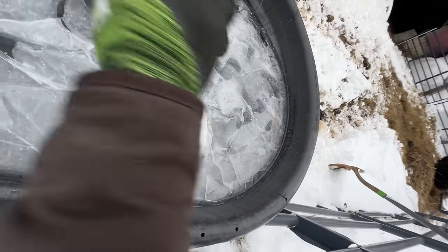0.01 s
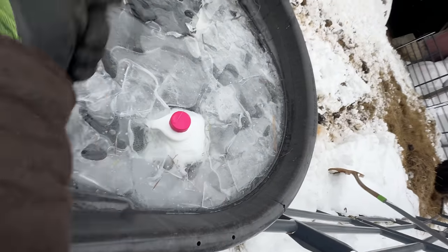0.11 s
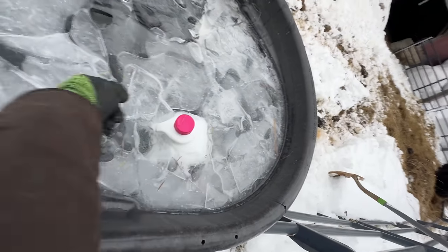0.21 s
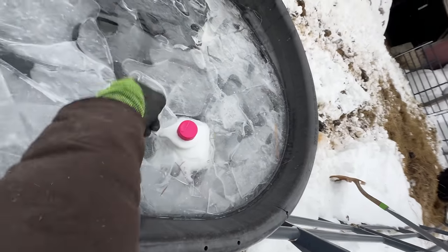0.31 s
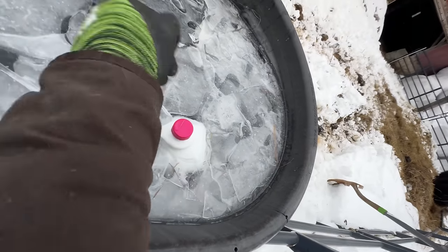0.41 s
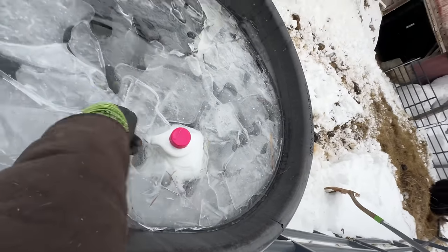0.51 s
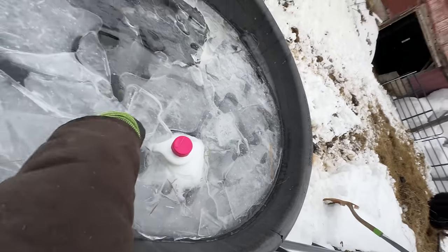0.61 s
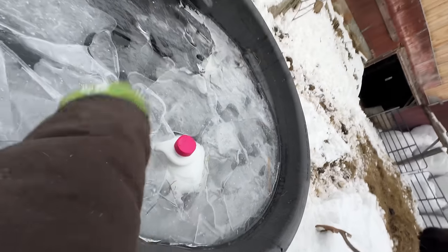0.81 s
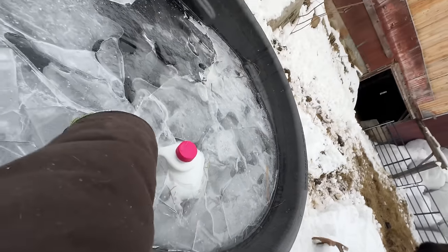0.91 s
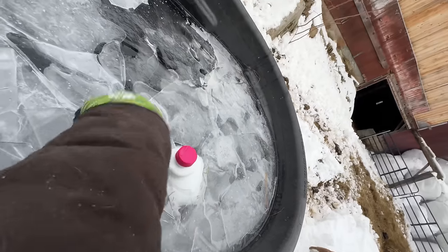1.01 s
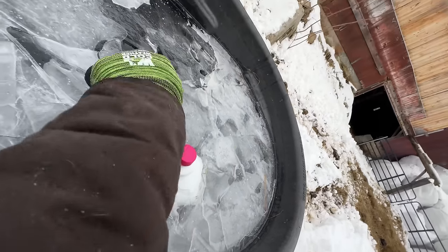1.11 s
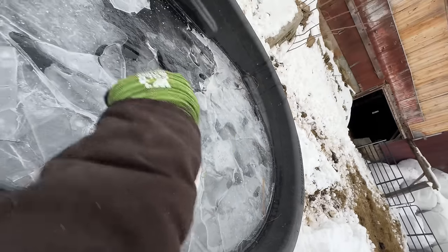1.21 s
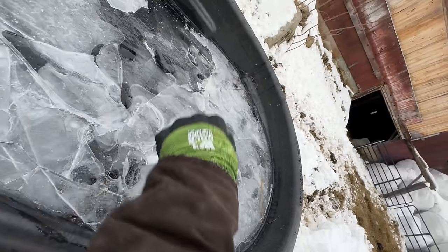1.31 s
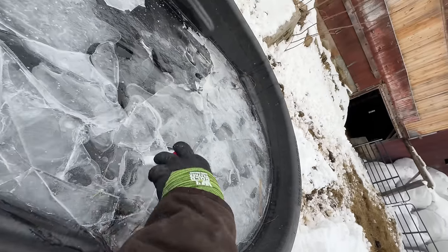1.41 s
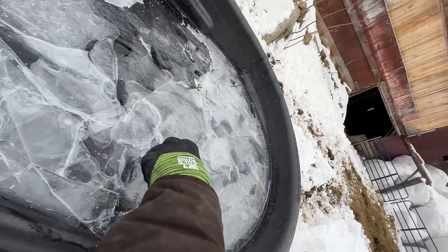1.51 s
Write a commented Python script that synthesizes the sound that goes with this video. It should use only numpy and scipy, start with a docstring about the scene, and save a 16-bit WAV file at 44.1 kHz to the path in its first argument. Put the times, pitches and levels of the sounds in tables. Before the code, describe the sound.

A gloved fist cracks ice on a plastic water trough in three quick blows, each a sharp snap with hollow thud and crumbling; shards clink, water gurgles at the end. Outdoors, close stereo microphone.

```python
"""A gloved fist punches the ice on a plastic water trough three times, outdoors, heard close up in stereo.
Each blow cracks the sheet (filtered grit), knocks its plates into the water and rings the trough (damped
sines), over a dull noise thud; crumbling follows and loose shards clink. Water sloshes and bubbles (noise,
pings, rising sines) as the hand comes back out, and a sleeve rustles (shaped noise), first on the first swing.
A near wall and the snowy yard return diffuse echoes over a faint outdoor rumble."""
import sys
import numpy as np
from scipy import signal
from scipy.fft import rfft, irfft
from scipy.io import wavfile

SR = 44100
rng = np.random.default_rng(int(sys.argv[2]) if len(sys.argv) > 2 else 0)


def digitize_waveform(pressure):
    """Quantize a signal to 16-bit integers and store it at the path in sys.argv[1].

    Rows of a 2-D input are taken as channels; values are limited to [-1, 1].
    """
    field = np.atleast_2d(pressure).T
    bounded = np.clip(field, -1, 1)
    quanta = np.round(bounded * 32767).astype(np.int16)
    wavfile.write(sys.argv[1], SR, quanta)


N = 68355  # samples, 1.55 s

# The fist lands: start_s, trough_db, favoured_pitch_hz, thud_db, hum_db, crumbling_db, crumbling_t60_s
FIST_BLOWS = [(0.2034, -17.5, 480, -17.5, -32.5, -25.5, 0.074), (0.5328, -21, 450, -18, -38, -20, .17),
              (0.874, -20, 243, -19, -31.5, -21, 0.25)]
# The sheet cracks or shards knock: start_s, level_db, hold_s, t60_s, peak_hz, peak_db (a dip if negative)
ICE_CRACKS = [(0.199, -12.5, 0.0019, 0.0044, 5820, 12), (0.2112, -22, 0.006, 0.082, 2950, 5),
              (0.2633, -32, 0.0041, 0.084, 4300, -1.5), (0.323, -39, 0.003, 0.027, 3830, 3),
              (0.37, -51, 0.01, .15, 3930, 3), (0.5215, -28.5, 0.015, 0.06, 2780, 12),
              (0.5344, -12.5, 0.0041, 0.0052, 4260, 1), (0.5453, -24.5, 0.0022, 0.039, 5900, -1),
              (0.601, -36, 0.0026, 0.019, 5740, 14), (0.6378, -41, 0.0036, 0.074, 5800, 4),
              (0.669, -49, 0.0053, .08, 4000, -5), (0.718, -59, 0.0045, 0.15, 4000, 0),
              (0.8643, -33, .005, 0.012, 1290, 2.5), (0.8707, -12.5, 0.003, 0.062, 5140, 3),
              (0.936, -36.5, 0.0034, 0.12, 6400, 22), (0.9828, -31.5, 0.012, 0.11, 4800, 0),
              (1.034, -46, 0.016, 0.19, 4570, 4.5), (1.116, -51, 0.018, 0.31, 3440, -0.5),
              (1.309, -57, 0.0059, 0.09, 1360, 10.5), (1.4276, -34.5, 0.0032, 0.058, 3780, 7),
              (1.4582, -45, 0.0022, 0.015, 2340, 10)]
# Colour of breaking ice: pitch_hz, level_db
ICE_SPECTRUM = [(100, -21.5), (600, 2.5), (1400, -6), (2600, -0.5), (4200, -1), (7000, -1.5), (10000, 0),
                (12500, -41.5), (15500, 5.5)]
# Plates give way with damped knocks, lower as they sink: start_s, level_db, pitch_hz, t60_s
PLATE_KNOCKS = [(0.2038, -13, 535, 0.033), (0.2100, -10, 387, 0.14), (0.2150, -10, 120.2, 0.22),
                (0.5322, -2.5, 641, 0.024), (0.5370, -12.5, 329, 0.036), (0.5500, -12.5, 131.2, 0.12),
                (0.8730, -26.5, 860, 0.15), (0.8770, -4.5, 219, 0.045), (0.8795, -7, 110.8, 0.09)]
# Vibrations of trough and floating sheet: pitch_hz, level_db, t60_s
TROUGH_MODES = [(100, -2, 0.12), (172.2, -3, 0.28), (226.2, -5, 0.22), (281, -17.5, 0.28), (328, 5, 0.064),
                (376.2, 1, 0.098), (420, -11, 0.19), (501.4, -2.5, 0.13), (558.6, 3.5, 0.087),
                (645, -3, 0.056), (846, -9.5, 0.048), (926, -4.5, 0.068), (1058, -11, 0.12)]
# The full tub hums on: pitch_hz, level_db, t60_s
TUB_HUM_MODES = [(142.1, 3.5, 0.47), (159.2, -6, 0.61), (185.8, -8, 0.48), (103.4, -10.5, 0.96),
                 (560, -24.5, 0.73)]
# Colour of the dull thud: pitch_hz, level_db
THUD_SPECTRUM = [(25, -28), (60, -12), (120, -4), (300, -3), (600, -13.5), (900, -21), (1300, -24.5),
                 (2500, -28.5), (16000, -65.5)]
# Course of the sloshing water: time_s, level_db
SLOSH_LEVEL = [(0, -57), (.15, -57), (.21, -44), (.31, -44), (.44, -62), (.62, -56), (.8, -66), (.98, -45),
               (1.1, -58), (1.27, -63), (1.31, -52), (1.38, -51), (1.44, -46), (1.55, -43)]
# Colour of the washing water: pitch_hz, level_db
WATER_SPECTRUM = [(25, -17.5), (60, 2), (140, 3.5), (250, -2), (400, -4.5), (650, -7.5), (1000, -15.5),
                  (1800, -17), (4000, -23), (16000, -48)]
# Colour of the gurgling: pitch_hz, level_db
GURGLE_SPECTRUM = [(150, -3), (400, -1), (700, -2.5), (1500, -13.5), (2500, -46), (16000, -97)]
# Air pockets gulp: start_s, level_db, starting_pitch_hz, t60_s
AIR_POCKETS = [(1.4025, -34, 654, 0.087), (1.431, -39, 123, 0.1), (1.4949, -35.5, 380, 0.057)]
# Course of the sleeve's rustle: time_s, level_db
SLEEVE_LEVEL = [(0, -48), (.07, -47), (.18, -45), (.28, -48), (.41, -57), (.48, -55), (.58, -82.5),
                (.8, -75), (1.0, -54), (1.22, -66), (1.34, -48.5), (1.47, -51.5), (1.55, -41)]
# Colour of rubbing cloth: pitch_hz, level_db
CLOTH_SPECTRUM = [(30, 0), (150, 2), (600, -3), (1200, 0.5), (3500, -1.5), (8000, -3), (10000, -4.5),
                  (12500, -28), (15500, 4.5)]
# Colour of the faint outdoor rumble: pitch_hz, level_db
AIR_SPECTRUM = [(25, -3.5), (60, -9), (110, 3.5), (250, -9.5), (600, -22), (2000, -26), (8000, -32.5),
                (16000, -38.5)]

CRACK_ATTACK_S, PEAK_WIDTH_OCTAVES = 0.00069, 0.67
SNAP_DB, SNAP_T60_S = -12, 0.0014  # the instant of fracture, relative to each crack
# Below the strong level, the snap moves earlier with every dB and the crack itself starts at once
SNAP_SHIFT_S_PER_DB, STRONG_CRACK_DB = -0.07, -15
CRUMBLE_DELAY_S, CRUMBLE_ATTACK_S, CRUMBLE_HOLD_S = 0.00067, 0.0083, 0.007
CHIPS_PER_S, CHIP_SPREAD_DB, CHIP_CYCLES, CHIP_DB = 2500, 4, 34, -1
LARGEST_GRAIN_DB = 12
SPOT_DB_PER_OCTAVE2, SPOT_RANGE_DB = 1.5, 27  # modes far from the favoured pitch are weaker
BEND_DELAY_S = 0.00488  # bending waves at 200 Hz arrive this late; higher ones are faster
SWELL_CYCLES, HUM_DELAY_S = 0.54, 0.03
THUD_ATTACK_S, THUD_HOLD_S, THUD_T60_S = 0.0018, 0.026, 0.12
GURGLES_PER_S, GURGLE_DB, GURGLE_CYCLES, GURGLE_SPREAD_DB = 400, -3.5, 14.7, 2.5
GURGLE_LOW_HZ, GURGLE_HIGH_HZ = 228.7, 1510
BUBBLE_RISE_PER_S = 0.8  # share of the starting pitch gained each second
AIR_DB = -60.5
LEFT_LAG_S, LAG_SPREAD, SIDE_DB = 4.3e-5, 0.18, 0.82  # left port hears later but louder; the lag varies
WALL_DB, WALL_T60_S, WALL_LOW_HZ = -1.5, 0.022, 525
YARD_DB, YARD_T60_S, YARD_LOW_HZ = -27.5, 0.5, 150
STOPBAND_HZ = 16700


def ice():
    """Fracturing ice is a stream of grit, opened by each crack or shard and crumbling after every blow."""
    grains = grit()
    cracks = 0
    for start, db, hold, t60, peak_hz, peak_db in ICE_CRACKS:
        # Most weak cracks thus have their snap before time zero, where it is not heard
        attack = CRACK_ATTACK_S + SNAP_SHIFT_S_PER_DB * max(STRONG_CRACK_DB - db, 0)
        body = envelope(start, attack, hold, t60)
        snap = from_db(SNAP_DB) * envelope(start + attack, 0, 0, SNAP_T60_S)
        crack = (body + snap) * coloured(grains, ICE_SPECTRUM, peak_hz, peak_db)
        cracks = cracks + at_ports(from_db(db) * crack)
    crumbling = 0
    for start, *_, db, t60 in FIST_BLOWS:
        shape = envelope(start + CRUMBLE_DELAY_S, CRUMBLE_ATTACK_S, CRUMBLE_HOLD_S, t60)
        crumbling = crumbling + from_db(db) * shape
    return cracks + at_ports(crumbling * coloured(grit(), ICE_SPECTRUM, peak_hz=2900, peak_db=1.5))


def grit():
    """Steady stream of tiny fractures: dry snaps, and chips that ring briefly."""
    snaps = rng.standard_normal(N) * grain_sizes(CHIP_SPREAD_DB)
    chips = pings(CHIPS_PER_S, CHIP_SPREAD_DB, low_hz=917.6, high_hz=9925, cycles=CHIP_CYCLES)
    return rms_one(snaps) + from_db(CHIP_DB) * chips


def plates():
    """Plates giving way under the fist knock hollowly, each a damped vibration."""
    return sum(at_ports(from_db(db) * ring(start, hz, t60)) for start, db, hz, t60 in PLATE_KNOCKS)


def trough():
    """Bending waves ring the trough, highs first, over a dull thud; the full tub hums on."""
    rings, thuds = 0, 0
    for start, db, spot_hz, thud_db, hum_db, *_ in FIST_BLOWS:
        for k, (hz, mode_db, t60) in enumerate(TROUGH_MODES):
            loss_db = min(SPOT_DB_PER_OCTAVE2 * np.log2(hz / spot_hz) ** 2, SPOT_RANGE_DB)
            arrival = start + BEND_DELAY_S * np.sqrt(200 / hz)
            polarity = (-1) ** k
            rings = rings + polarity * from_db(db + mode_db - loss_db) * ring(arrival, hz, t60)
        for hz, mode_db, t60 in TUB_HUM_MODES:
            rings = rings + from_db(hum_db + mode_db) * ring(start + HUM_DELAY_S, hz, t60)
        thuds = thuds + from_db(thud_db) * envelope(start, THUD_ATTACK_S, THUD_HOLD_S, THUD_T60_S)
    return at_ports(rings) + at_ports(thuds * noise(THUD_SPECTRUM))


def water():
    """Water washes as noise and gurgles as pings between the pieces; air pockets gulp with rising pitch."""
    gulps = 0
    for start, db, hz, t60 in AIR_POCKETS:
        gulps = gulps + from_db(db) * ring(start, hz, t60, BUBBLE_RISE_PER_S)
    gurgles = pings(GURGLES_PER_S, GURGLE_SPREAD_DB, GURGLE_LOW_HZ, GURGLE_HIGH_HZ, GURGLE_CYCLES)
    wash = noise(WATER_SPECTRUM) + from_db(GURGLE_DB) * coloured(gurgles, GURGLE_SPECTRUM)
    return at_ports(level(SLOSH_LEVEL) * wash + gulps)


def sleeve():
    """The coat's cloth rubs as the arm moves: noise that follows a level curve."""
    return at_ports(level(SLEEVE_LEVEL) * noise(CLOTH_SPECTRUM))


def air():
    """Faint, steady outdoor rumble."""
    return at_ports(from_db(AIR_DB) * noise(AIR_SPECTRUM))


def at_ports(x, size=2048, lead=8):
    """A sound from one place reaches the right microphone port, then the left, then returns from the wall."""
    taps = np.arange(size) - lead  # the lead leaves room for the interpolation kernel
    lag = LEFT_LAG_S * SR * (1 + LAG_SPREAD * rng.normal())
    left = np.sinc(taps - lag) * from_db(SIDE_DB)
    right = np.sinc(taps) * from_db(-SIDE_DB)
    paths = np.array([left, right]) + from_db(WALL_DB) * reflections(WALL_T60_S, WALL_LOW_HZ, size)
    return signal.fftconvolve(x[None], paths, axes=1)[:, lead:lead + N]


def reflections(t60, low_hz, size):
    """Diffuse echoes of a click, different on each side, with the bass removed."""
    tails = rng.standard_normal((2, size)) * envelope(0.00071, 0.00017, 0, t60)[:size]
    tails /= np.sqrt(np.sum(tails ** 2, axis=1, keepdims=True))
    return signal.sosfilt(signal.butter(2, low_hz, "high", fs=SR, output="sos"), tails)


def ring(start, hz, t60, rise=0):
    """A damped vibration that swells within about a cycle and may rise in pitch."""
    t = since(start)
    tone = np.sin(2 * np.pi * hz * t * (1 + .5 * rise * t))
    swell = 1 - np.exp(-t * hz / SWELL_CYCLES)
    return tone * swell * from_db(-60 * t / t60)


def pings(per_s, spread_db, low_hz, high_hz, cycles, count=28):
    """Random taps of uneven size excite resonators that each ring some cycles (to -60 dB); unit power."""
    sizes = grain_sizes(spread_db) * rng.choice([-1, 1], N)
    clicks = sizes * (rng.random(N) < per_s / SR)
    dealt = rng.integers(0, count, N)  # which resonator each click strikes
    pitches = np.geomspace(low_hz, high_hz, count) * rng.uniform(.96, 1.04, count)
    out = 0
    for k, hz in enumerate(pitches):
        radius = from_db(-60 * hz / (cycles * SR))
        angle = 2 * np.pi * hz / SR
        poles = [1, -2 * radius * np.cos(angle), radius * radius]
        struck = clicks * (dealt == k) + 1e-18  # tiny offset keeps the filter off denormals
        out = out + np.sqrt(hz) * signal.lfilter([0, np.sin(angle)], poles, struck)
    return rms_one(out)


def grain_sizes(spread_db):
    """Many small grains and a few larger ones, up to a limit."""
    return from_db(np.minimum(spread_db * rng.exponential(1, N), LARGEST_GRAIN_DB))


def noise(spectrum):
    """Steady noise with a spectrum."""
    return coloured(rng.standard_normal(N), spectrum)


def coloured(x, spectrum, peak_hz=1000, peak_db=0):
    """Give a steady sound a spectrum and perhaps one broad peak or dip; unit power."""
    octave = np.log2(np.maximum(np.arange(N // 2 + 1) * SR / N, 1))
    hz, db = np.transpose(spectrum)
    curve_db = np.interp(octave, np.log2(hz), db)
    bump_db = peak_db * np.exp(-.5 * ((octave - np.log2(peak_hz)) / PEAK_WIDTH_OCTAVES) ** 2)
    return rms_one(irfft(rfft(x) * from_db(curve_db + bump_db), N))


def envelope(start, attack, hold, t60):
    """Linear rise, and exponential fall once the hold time since the start is over."""
    rise = np.minimum(since(start) / max(attack, 1e-5), 1)
    return rise * from_db(-60 * since(start + hold) / t60)


def level(rows):
    """Gain along a curve of time_s, level_db."""
    return from_db(np.interp(since(0), *np.transpose(rows)))


def since(start):
    """Seconds since a moment, zero before it."""
    return np.maximum(np.arange(N) / SR - start, 0)


def rms_one(x):
    """Scale to unit power."""
    return x / np.sqrt(np.mean(x ** 2) + 1e-20)


def from_db(db):
    """Decibels to gain."""
    return 10 ** (np.asarray(db) / 20)


def scene():
    """The close sounds, their faint echo from the snowy yard, and the air."""
    near = ice() + plates() + trough() + water() + sleeve()
    echoes = reflections(YARD_T60_S, YARD_LOW_HZ, size=30000)
    yard = signal.fftconvolve(near, echoes, axes=1)[:, :N]
    return near + from_db(YARD_DB) * yard + air()


def record(dry):
    """The recorder rounds peaks by soft saturation and cuts the top steeply."""
    top_cut = signal.cheby2(16, 70, STOPBAND_HZ, fs=SR, output="sos")
    return signal.sosfilt(top_cut, np.tanh(dry))


dry = scene()
out = record(dry)
digitize_waveform(out)
```